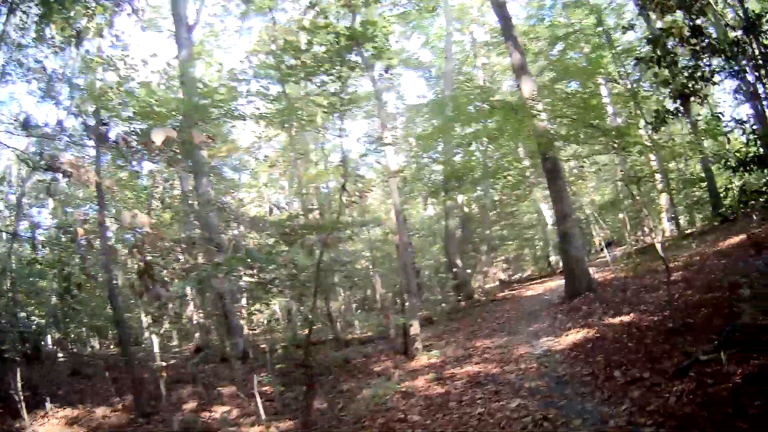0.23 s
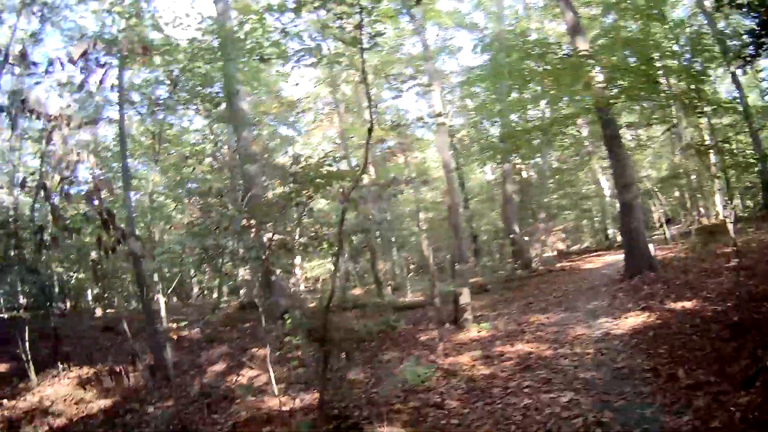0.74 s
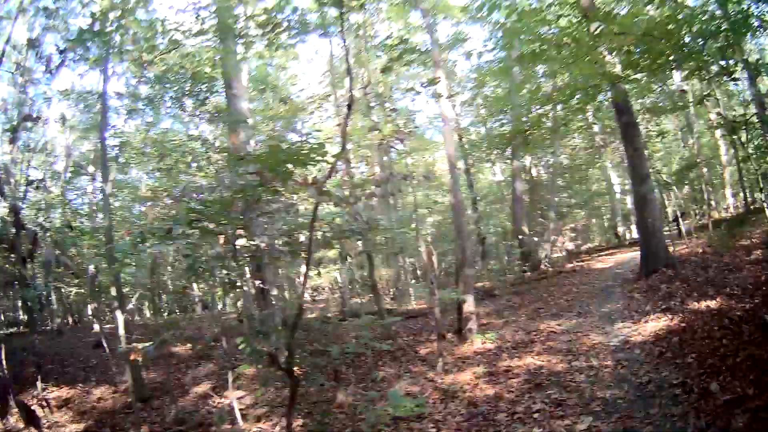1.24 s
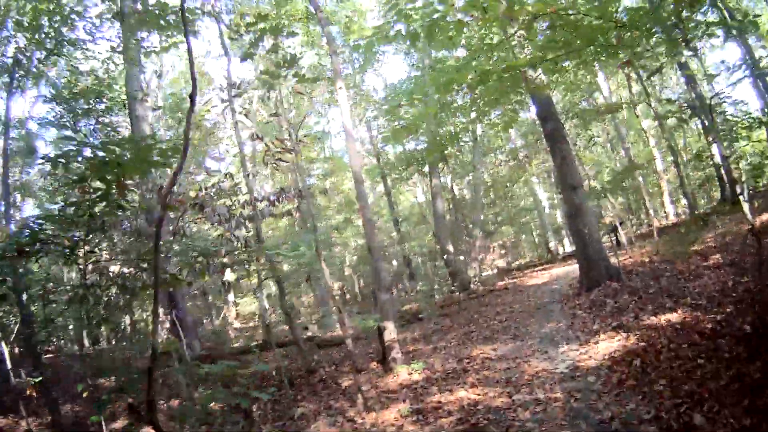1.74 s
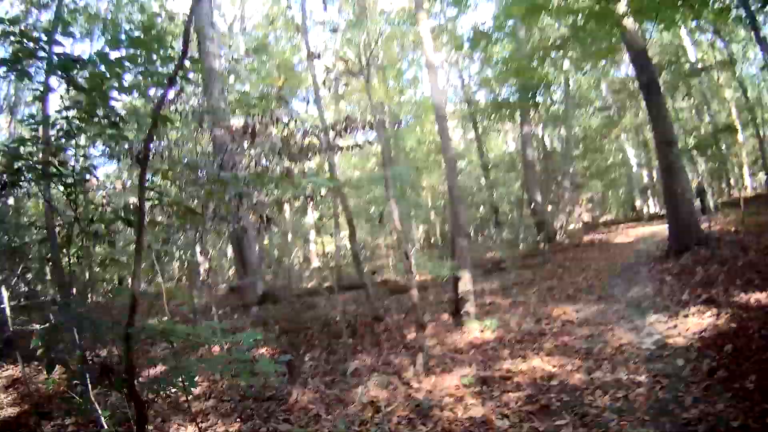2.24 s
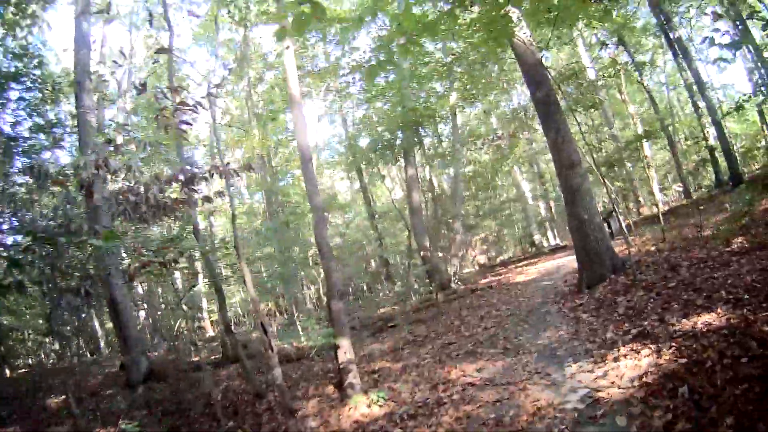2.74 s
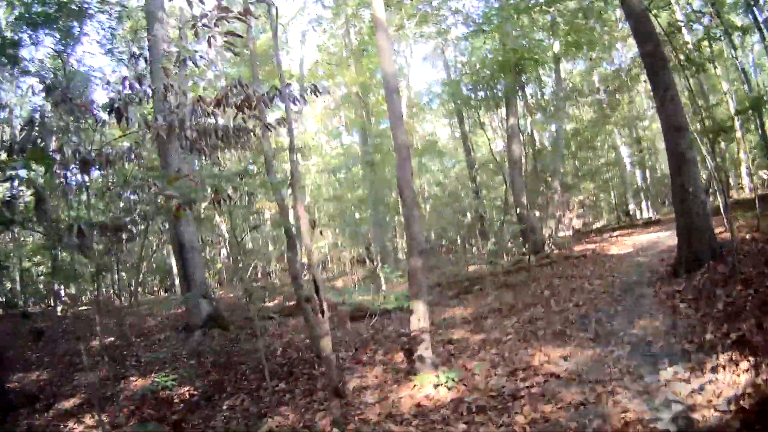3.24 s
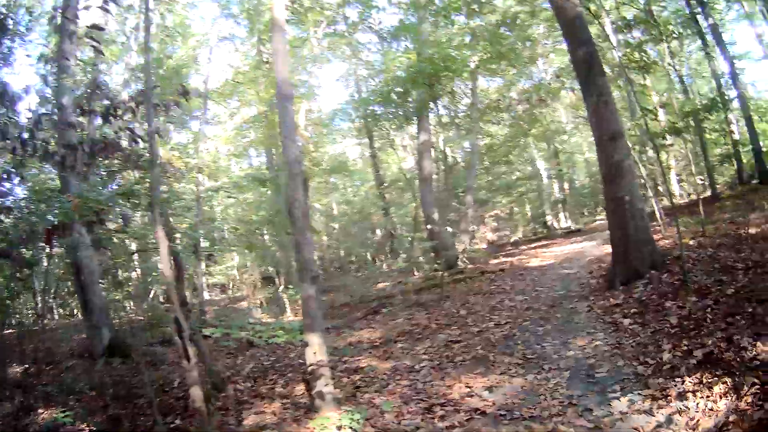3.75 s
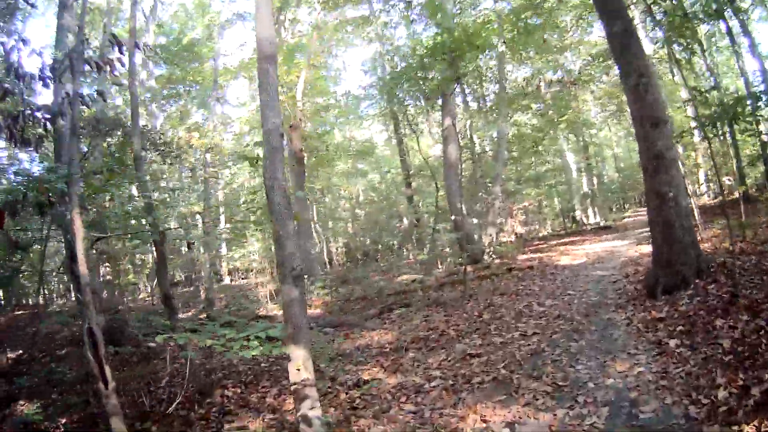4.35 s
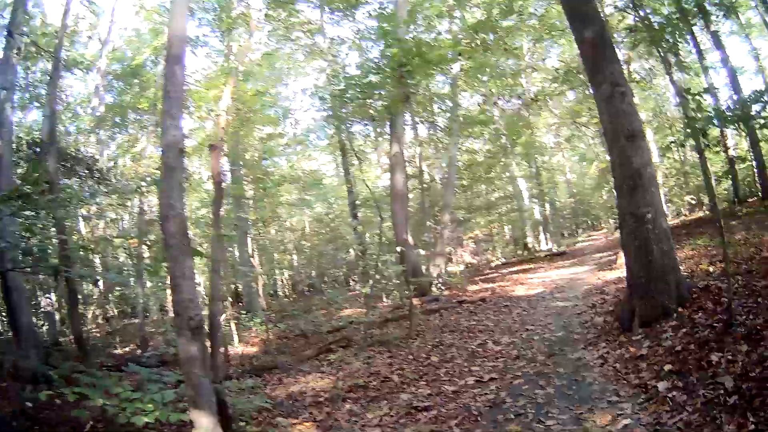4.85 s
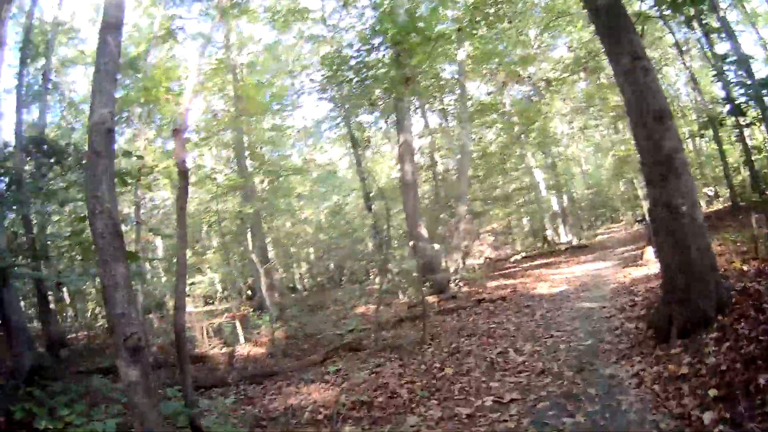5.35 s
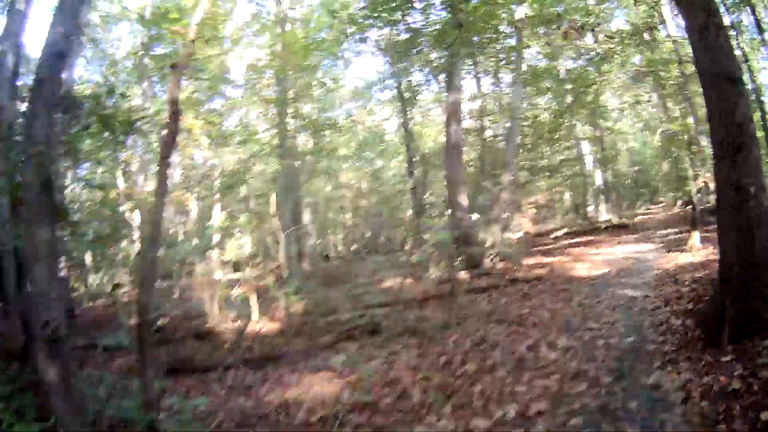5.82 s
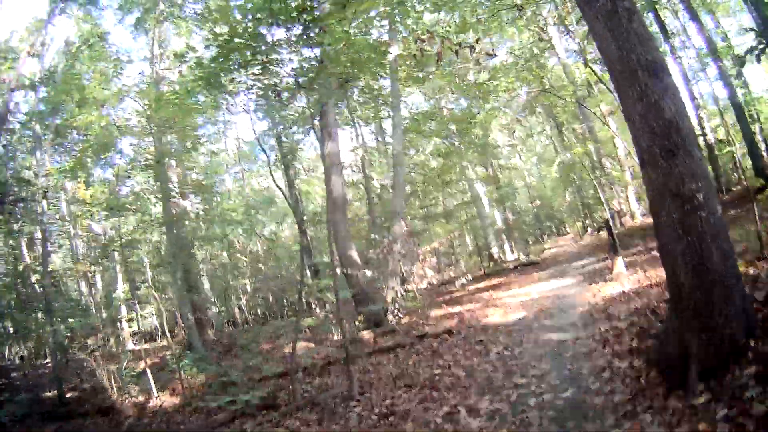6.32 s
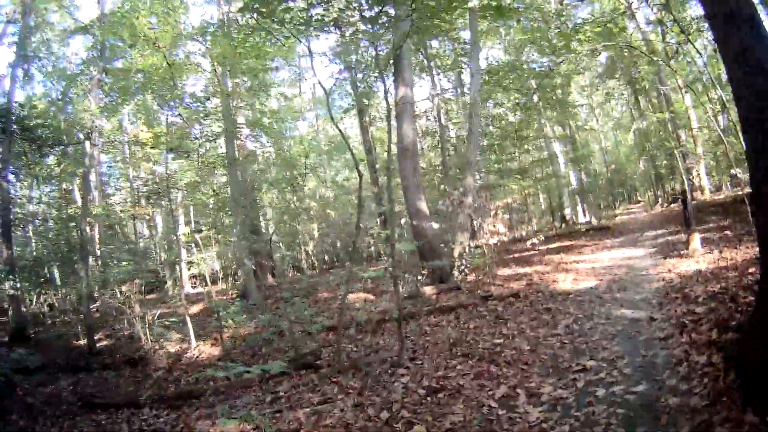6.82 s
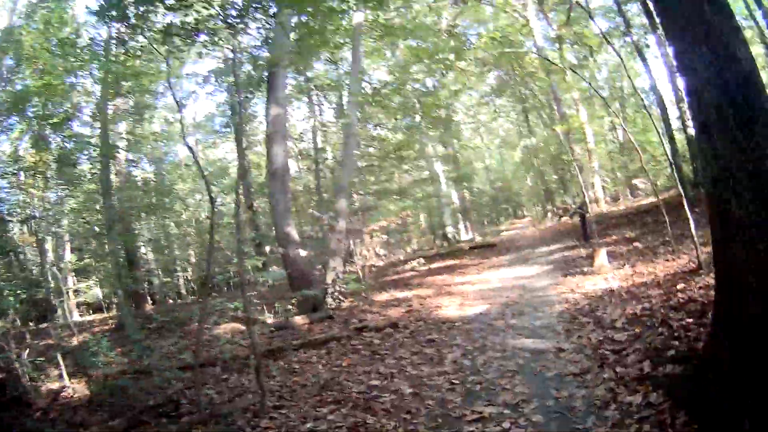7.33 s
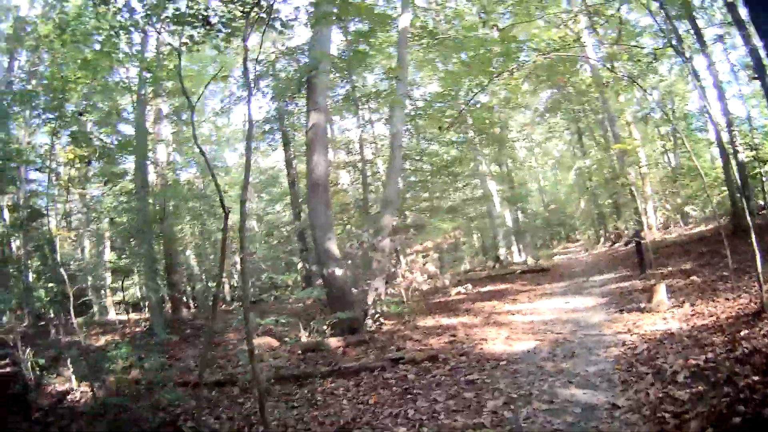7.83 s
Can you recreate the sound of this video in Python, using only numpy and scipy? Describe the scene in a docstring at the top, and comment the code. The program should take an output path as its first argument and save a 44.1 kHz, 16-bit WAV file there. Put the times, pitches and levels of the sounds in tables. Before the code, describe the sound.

Outdoors in quiet woods, regular footsteps crunch through dry leaves close to a carried microphone. Grainy soil scuffs come with brittle cracks and short woody knocks, becoming somewhat heavier later. Between steps, loose litter rustles softly. Wind thumps low in brief gusts, a faint distant hum persists, crickets trill thinly, and a bird gives a few very quiet chips near two seconds.

```python
"""Someone carrying a microphone walks a leaf-strewn dirt trail in the woods.
From the start wind rumbles, a distant hum drones and two crickets trill over a far chorus (shaped noise, sines).
Each step scuffs soil and crushes dry leaves (clouds of short wavelets), and the microphone heaves with the gait.
Brittle leaves snap from 0.1 s (resonated bursts) and grit knocks from 0.55 s (damped rings).
A bird chips at 1.6 s and again from 2.2 s (gliding sines)."""
import sys
import numpy as np
from scipy import signal
from scipy.fft import rfft, irfft
from scipy.io import wavfile
from scipy.ndimage import uniform_filter1d

SR = 44100
rng = np.random.default_rng(int(sys.argv[2]) if len(sys.argv) > 2 else 0)


def waveform_to_disk(signal):
    """Save audio, clipped to [-1, 1], as 16-bit WAV at the path in sys.argv[1]."""
    frames = np.transpose(np.atleast_2d(signal))
    scaled = np.clip(frames, -1, 1) * 32767
    samples = np.round(scaled).astype(np.int16)
    wavfile.write(sys.argv[1], SR, samples)


N = 356283
TIME = np.arange(N) / SR


def gain_of(db):
    """Level: 20 dB is a factor of ten in amplitude."""
    return 10 ** (np.asarray(db) / 20)


def evened(x):
    """Normalisation: x scaled to rms 1."""
    return x / np.sqrt(np.mean(x ** 2) + 1e-20)


def pooled(gains):
    """Incoherent addition: unrelated sounds add in power."""
    return np.sqrt(sum(g ** 2 for g in gains))


def columns(rows):
    """Linear interpolation: every column of a (time, ...) table, sample by sample."""
    s, *rest = np.transpose(rows)
    return [np.interp(TIME, s, c) for c in rest]


def add(mix, s, sound):
    """Superposition: adds the sound to the mix from time s."""
    part = mix[round(s * SR):][:len(sound)]
    part += sound[:len(part)]


def coloured(x, points):
    """Spectral shaping: filters x by (frequency [Hz], gain [dB]) points, then scales it to rms 1."""
    hz, db = np.transpose(points)
    f = np.fft.rfftfreq(len(x), 1 / SR)
    gain = gain_of(np.interp(np.log(f + 1), np.log(hz + 1), db))
    return evened(irfft(rfft(x) * gain, len(x)))


def resonate(x, hz, width):
    """Resonance: a single damped mode of gain 1, whose bandwidth sets its decay."""
    r = np.exp(-np.pi * width / SR)
    return 2 * signal.lfilter([1 - r], [1, -r * np.exp(2j * np.pi * hz / SR)], x).real


def wobble(seconds):
    """Random modulation: noise averaged twice over the given time, rms 1."""
    size = int(seconds * SR)
    once = uniform_filter1d(rng.standard_normal(N), size)
    return evened(uniform_filter1d(once, size))


def swell(start, rise, end, sag_db_per_s, release):
    """Envelope: gain rises from start, sags exponentially, and decays faster after end."""
    t = TIME - start
    sag_db = sag_db_per_s * np.maximum(t - rise, 0)
    release_db = 20 * np.maximum(t - end, 0) / max(release, .002)
    return np.clip(t / max(rise, .002), 0, 1) ** 2 * gain_of(-sag_db - release_db)


def grains(low_hz, high_hz, per_s, cycles, spread_db, clumps_db, count):
    """Granular friction: wavelets at random moments, mostly small, a few large, swelling in clumps."""
    sizes = gain_of(spread_db * np.minimum(rng.exponential(1, N), 4))
    sizes *= rng.random(N) < per_s / SR
    sizes *= rng.choice([-1., 1.], N) * gain_of(clumps_db)
    kind, out = rng.integers(0, count, N), np.zeros(N)
    for k, hz in enumerate(np.geomspace(low_hz, high_hz, count)):
        turns = np.arange(int(6 * cycles * SR / hz)) * hz / SR
        wavelet = np.sin(2 * np.pi * turns) * turns * np.exp(-2 * turns / cycles)
        out += signal.oaconvolve(sizes * (kind == k), wavelet / np.linalg.norm(wavelet))[:N]
    return evened(out)


# wind spectrum: (frequency [Hz], level per Hz [dB])
WIND_COLOUR = [(4.7, -28), (8, -18.5), (18, 0.5), (50, -13.5), (100, -21), (130, -41), (200, -42.5),
               (340, -57.5), (570, -120)]
# gusts: (peak time [s], level [dB], half-width to 1/e [s])
GUSTS = [(.13, -39, 0.085), (.79, -29.5, 0.076), (1.8, -52, 0.064), (2.32, -48, 0.085), (3.45, -46.5, 0.13),
         (4.33, -34.5, 0.043), (4.5, -43, 0.32), (4.7, -40.5, 0.11), (6.67, -34, 0.11), (7.05, -38.5, 0.06),
         (7.86, -32, 0.05)]
WIND_DB = -44  # steady wind
STRIDE_WIND_DB, STRIDE_WIND_S = -48.5, 0.14  # a puff as each step takes the weight


def wind():
    """Turbulent pressure: low noise on the microphone, with lumps, gusts and a puff at each step."""
    puffs = GUSTS + [(s + weight, STRIDE_WIND_DB, STRIDE_WIND_S) for s, weight, *_ in STEPS]
    puff_gains = [gain_of(db) * np.exp(-((TIME - s) / width) ** 2) for s, db, width in puffs]
    level = pooled([gain_of(WIND_DB)] + puff_gains)
    lumps_db = 1.5 * wobble(.03)
    return level * gain_of(lumps_db) * coloured(rng.standard_normal(N), WIND_COLOUR)


# hush of the woods: (frequency [Hz], relative level [dB])
AIR_COLOUR = [(70, -23.5), (120, 0.5), (212, -8.5), (817, -17), (1850, -23), (3320, -27.5), (7130, -29.5),
              (8370, -37.5), (10900, -65)]
AIR_DB = -58


def air():
    """Ambient noise: a broadband hush whose level flickers."""
    return gain_of(AIR_DB + 0.99 * wobble(0.029)) * coloured(rng.standard_normal(N), AIR_COLOUR)


# distant hum: (time [s], frequency [Hz], level [dB])
HUM = [(0, 160.7, -64.5), (3, 161.2, -62), (6.2, 157.8, -62), (6.5, 156.3, -67.5), (8.1, 159.6, -65.5)]


def hum():
    """Frequency modulation: a distant sine wavers in pitch and level."""
    hz, level_db = columns(HUM)
    phase = 2 * np.pi * np.cumsum(hz + 1.5 * wobble(0.09)) / SR
    return np.sqrt(2) * gain_of(level_db + 1.1 * wobble(0.26)) * np.sin(phase)


# each cricket: pulse rate [1/s], mid-pulse pitch [Hz], then rows
# (time [s], lateness as the distance changes [ms])
NEAR_CRICKET = 50, 4170, [(0, 7), (.5, 11), (1, 12), (2, 15.6), (2.5, 19.6), (3.1, 20.8), (3.6, 19.8),
                (4.8, 19.6), (5.3, 20.4), (6.1, 25), (6.4, 26), (7, 25), (8.1, 22.6)]
FAR_CRICKET = 58.2, 4330, [(0, -7), (1.9, -7), (2.6, -3), (4, -4), (5, 1.8), (6.1, 7), (6.5, 7), (7.4, 3),
               (8.1, 2.5)]
# cricket levels: (time [s], near level [dB], far level [dB])
CRICKET_LEVELS = [(0, -71.5, -77), (.5, -72.5, -69), (1.5, -67.5, -72.5), (2.5, -70, -75.5),
                  (3.6, -64.5, -70), (4.2, -69.5, -72.5), (4.8, -60.5, -73.5), (5.4, -67.5, -74),
                  (6.1, -67.5, -76), (6.4, -80, -80), (7, -70, -79), (7.4, -69.5, -70.5), (8.1, -71.5, -68)]


def cricket(per_s, centre_hz, rows, level_db, length=.0135, fall_hz=850):
    """Stridulation: each wing stroke is a short tone that slides down as the stroke slows."""
    late_ms = columns(rows)[0]
    strokes = per_s * (TIME - late_ms / 1000) + .5
    u = (strokes % 1 - .5) / per_s  # time from mid-pulse
    uneven, detune, start = rng.standard_normal((600, 3))[strokes.astype(int) % 600].T
    slide = fall_hz * (u ** 2 / (2 * length) + u ** 3 / (3 * length ** 2))
    turns = (centre_hz + 40 * detune) * u - slide + start
    pulse = np.cos(np.pi * np.clip(u / length, -.5, .5)) ** 2
    return gain_of(level_db + 2.0 * uneven) * evened(np.sin(2 * np.pi * turns) * pulse)


CHORUS_HZ, CHORUS_DB = 4343, -70.5


def chorus():
    """Incoherent sum: many crickets farther off blur into a fuzzy band of noise."""
    band = resonate(resonate(rng.standard_normal(N), CHORUS_HZ, 650), CHORUS_HZ, 650)
    flutter_db = 1.5 * wobble(.006) + .8 * wobble(.3)
    return gain_of(CHORUS_DB + flutter_db) * evened(band)


# footfalls: (sole touches the leaves at [s], full weight after [s], rolls from heel to ball after [s],
# lull in that roll [dB], lifts after [s], scuff [dB], leaf crush [dB], thin crackle [dB])
STEPS = [(-.1, .04, 0.083, 0, 0.25, -55.5, -73, -77), (0.399, 0.011, 0.084, -4, 0.23, -50.5, -53.5, -58.5),
         (1.028, 0.019, 0.056, -11, 0.16, -50.5, -56.5, -61),
         (1.698, 0.023, 0.086, -8, .15, -52.5, -58.5, -64), (2.221, 0.069, 0.051, 0, 0.15, -50, -57, -62.5),
         (2.772, 0.053, 0.16, -5, 0.17, -45.5, -53.5, -60),
         (3.388, .05, .075, -0.5, 0.094, -47.5, -57.5, -66.5),
         (4.001, 0.022, 0.14, -1, .15, -48, -59, -63.5), (4.549, 0.072, 0.17, -8, 0.21, -48, -59, -65),
         (5.149, 0.073, .14, -14, 0.17, -46.5, -53.5, -59),
         (5.721, 0.11, .16, -2.5, 0.21, -50.5, -61.5, -70),
         (6.38, 0.036, 0.095, -2.5, .13, -51, -57.5, -70), (6.929, 0.035, 0.12, -14, 0.16, -46, -54, -60.5),
         (7.59, 0.016, 0.079, -6.5, 0.13, -46.5, -55, -67)]
# rustle between the steps: (time [s], level [dB], level of its dull part [dB])
RUSTLE = [(0, -68, -64), (.3, -74, -74), (.7, -64, -66), (1, -72.5, -70), (1.6, -72.5, -65.5),
          (2.05, -59, -59.5), (2.7, -59.5, -63), (3.1, -64, -70), (3.6, -56, -74), (3.9, -69.5, -75),
          (4.2, -60.5, -64), (4.8, -62, -71.5), (5.1, -70, -67.5), (5.5, -64.5, -72), (6, -61.5, -75),
          (6.3, -65.5, -67.5), (7.4, -64, -66.5), (8.1, -65, -71)]
RUSTLE_CRUSH_DB, RUSTLE_CRACKLE_DB = -9, -12.5  # under the rustle level
ROLL_S = 0.014  # half-width of the lull to 1/e
STEP_MURMUR_DB = -10  # dull part of the scuff
SCUFF_SAG_DB_PER_S, SCUFF_RELEASE_S = 40.5, 0.066  # the soil is loudest under full weight
# leaves give way from the first touch: rise [s], sag [dB/s], release [s]
CRUSH_RISE_S, CRUSH_SAG_DB_PER_S, CRUSH_RELEASE_S = 0.019, 28, 0.028
CRACKLE_RISE_S, CRACKLE_SAG_DB_PER_S, CRACKLE_RELEASE_S = 0.019, 46.5, .04
SCATTER_DB, SCATTER_S = -27, .03  # soil stirred by each knock, relative to the knock
DEBRIS_DB, DEBRIS_S = -10, 0.0087  # crumbs of leaf after each snap, relative to the snap


def tread():
    """Granular friction: the sole grinds soil in low grains; leaves crush and crackle in finer ones."""
    rustle, dull = gain_of(columns(RUSTLE))
    soil = [rustle]
    leaves = [rustle * gain_of(RUSTLE_CRUSH_DB)]
    fine = [rustle * gain_of(RUSTLE_CRACKLE_DB)]
    for s, weight, roll, lull_db, lift, scuff_db, crush_db, crackle_db in STEPS:
        lull = gain_of(lull_db * np.exp(-((TIME - s - roll) / ROLL_S) ** 2))
        grind = swell(s, weight, lift, SCUFF_SAG_DB_PER_S, SCUFF_RELEASE_S)
        give = swell(s, CRUSH_RISE_S, lift, CRUSH_SAG_DB_PER_S, CRUSH_RELEASE_S)
        splinter = swell(s, CRACKLE_RISE_S, lift, CRACKLE_SAG_DB_PER_S, CRACKLE_RELEASE_S)
        soil.append(lull * gain_of(scuff_db) * grind)
        leaves.append(lull * gain_of(crush_db) * give)
        fine.append(lull * gain_of(crackle_db) * splinter)
    soil += [gain_of(db + SCATTER_DB) * swell(s, 0, 0, 0, SCATTER_S) for s, db, *_ in KNOCKS]
    leaves += [gain_of(db + DEBRIS_DB) * swell(s, 0, 0, 0, DEBRIS_S) for s, db, *_ in SNAPS]
    # the litter gives way in jerks, heard in every grain size at once
    slips = wobble(.004) + .8 * wobble(.012)
    scuff = grains(510, 1125, per_s=1300, cycles=0.94, spread_db=3.0, clumps_db=2.0 * slips, count=9)
    crush = grains(1340, 3890, per_s=3300, cycles=1.34, spread_db=3.0, clumps_db=2.2 * slips, count=9)
    crackle = grains(4200, 7450, per_s=39000, cycles=3.7, spread_db=5.0, clumps_db=0.65 * slips, count=9)
    murmur = grains(248, 448, per_s=650, cycles=1.5, spread_db=1.5, clumps_db=1.7 * slips, count=5)
    soil_level = pooled(soil)
    murmur_level = pooled([dull, soil_level * gain_of(STEP_MURMUR_DB)])
    low = murmur_level * murmur + soil_level * scuff
    return low + pooled(leaves) * crush + pooled(fine) * crackle


def settling():
    """Elastic recovery: trodden leaves tick at random as they spring back."""
    return gain_of(-74) * grains(900, 3500, per_s=30, cycles=.8, spread_db=2.5, clumps_db=0, count=5)


# start of each step's heave cycle: time [s]
GAIT = [-.45, .144, .75, 1.299, 1.888, 2.447, 3.046, 3.617, 4.186, 4.775, 5.382, 5.981, 6.581, 7.17, 7.778,
        8.38]
# harmonics of the heave: (multiple of the step rate, level [dB], lag [cycles])
HEAVE = [(1, -35, .27), (2, -33, -.03), (3, -41, -.04), (4, -43.5, -.04), (5, -48, .02)]


def heave():
    """Harmonic series: the microphone rises and drops with each step, swinging pressure below hearing."""
    steps = np.interp(TIME, GAIT, np.arange(len(GAIT)))
    swing = sum(np.sqrt(2) * gain_of(db) * np.cos(2 * np.pi * (k * steps - lag)) for k, db, lag in HEAVE)
    return swing * gain_of(2.2 * wobble(0.48))


# bright snaps: (time [s], peak level [dB], length [s], centre of the colour [Hz])
SNAPS = [(0.103, -48.5, 0.0013, 2400), (0.197, -36.5, 0.0053, 3300), (0.6717, -37, 0.0036, 4350),
         (0.894, -55, 0.0028, 6500), (1.11, -46, 0.0043, 4070), (1.252, -38, 0.0033, 2200),
         (1.2656, -35.5, 0.0014, 4600), (1.279, -42.5, 0.0023, 2800), (1.319, -48, .002, 2400),
         (1.362, -42, 0.0083, 3630), (1.844, -40.5, 0.0042, 5150), (2.058, -49, 0.004, 6000),
         (2.506, -39.5, 0.0062, 3300), (2.95, -39.5, 0.01, 5400), (3.677, -40, 0.0034, 3760),
         (3.771, -41.5, 0.0035, 5000), (3.789, -44, 0.0096, 3200), (4.128, -40.5, 0.012, 5000),
         (4.13, -54, 0.0036, 5440), (4.843, -48, 0.0042, 3300), (5.32, -43.5, 0.0028, 3480),
         (5.321, -57, 0.0035, 3500), (5.4074, -41.5, 0.0032, 4330), (6.035, -42.5, 0.0064, 3600),
         (6.4976, -38.5, 0.0059, 5370), (7.1274, -38.5, 0.0024, 4070), (7.225, -45, 0.0047, 3300),
         (7.733, -38, 0.006, 4810)]
# modes of the brittle body: (frequency [Hz], nominal width [Hz], level [dB])
SNAP_RING = [(1300, 660, 2), (2200, 770, 3), (3300, 820, 2), (4420, 1100, -1.5), (5330, 1960, 0),
             (6620, 580, -14)]


def snaps():
    """Modal excitation: milliseconds of tiny cracks ring the same brittle body each time."""
    out, t = np.zeros(N), np.arange(1300) / SR
    no_bass = signal.butter(N=2, Wn=900, btype="high", fs=SR, output="sos")  # small things radiate no bass
    all_cracks = rng.standard_normal((len(SNAPS), len(t)))
    for (s, db, length, centre_hz), cracks in zip(SNAPS, all_cracks):
        burst = cracks * np.sqrt(abs(cracks)) * np.exp(-(t / max(length, .0005)) ** 2)
        snap = np.zeros(len(t))
        for hz, width, mode_db in SNAP_RING:
            mode = resonate(resonate(burst, hz, 0.96 * width), hz, 0.96 * width)
            # modes far from the centre of the colour are weaker
            snap += gain_of(mode_db - 4.6 * np.log2(hz / centre_hz) ** 2) * mode / np.sqrt(width)
        snap = signal.sosfilt(no_bass, snap)
        add(out, s, gain_of(db) * snap / abs(snap).max())
    return out


# dull knocks of grit and twigs under the sole:
# (time [s], ring level [dB], pitch [Hz], sharp edge relative to the ring [dB])
KNOCKS = [(0.55, -30, 714, -15), (0.72, -32.5, 550, -20), (1.312, -39, 820, -7), (1.726, -34.5, 700, -13),
          (1.883, -31.5, 543, -26), (2.321, -32, 850, -3.5), (2.393, -34.5, 960, -24),
          (2.463, -44.5, 468, -7), (2.867, -26, 690, -12), (3.033, -31.5, 574, -20),
          (3.4933, -21.5, 940, -12), (4.0435, -25.5, 654, -6.5), (4.143, -33.5, 530, -9),
          (4.206, -35.5, 550, -20), (4.307, -34.5, 607, -10.5), (4.802, -35.5, 916, -6.5),
          (5.049, -47, 870, 1.5), (5.259, -36, 526, -21), (5.393, -32.5, 605, -15), (5.815, -32, 623, -17),
          (6.58, -32, 486, -32), (6.968, -29, 584, -9), (7.04, -22.5, 890, -12.5), (7.063, -27.5, 800, -28),
          (7.183, -27, 780, -18.5), (7.208, -43, 895, -3), (7.675, -33.5, 915, -11), (7.782, -31, 550, -25)]


def knocks():
    """Impact: a brief damped ring, led by a short sharp edge where something breaks."""
    out, t = np.zeros(N), np.arange(1000) / SR
    for s, db, hz, edge_db in KNOCKS:
        turns = hz * t
        ring = (turns / 0.76 * np.exp(1 - turns / 0.64)) ** 1.75 * np.sin(2 * np.pi * turns)
        edge_envelope = t / 0.00017 * np.exp(1 - t / 0.00022)
        edge = gain_of(edge_db) * np.sin(2 * np.pi * 1900 * t) * edge_envelope
        add(out, s, gain_of(db) * (ring + edge))
    return out


# bird notes: (time [s], length [s], start pitch [Hz], end pitch [Hz], glide time [s], peak level [dB])
CHIPS = [(1.602, 0.018, 5400, 7700, 0.0063, -56.5), (2.243, 0.011, 5900, 6270, 0.003, -54),
         (2.265, 0.0064, 6150, 6100, 0.0031, -56), (2.285, .012, 6250, 6130, .004, -56)]


def bird():
    """Frequency glide: thin whistles relax exponentially to their end pitch."""
    out = np.zeros(N)
    for s, length, start_hz, end_hz, glide, db in CHIPS:
        t = np.arange(int(length * SR)) / SR
        hz = end_hz + (start_hz - end_hz) * np.exp(-t / glide)
        whistle = np.sin(2 * np.pi * np.cumsum(hz) / SR)
        add(out, s, gain_of(db) * signal.windows.tukey(len(t), .6) * whistle)
    return out


def scene():
    """Superposition: the walker, the woods and the wind add linearly."""
    near_db, far_db = columns(CRICKET_LEVELS)
    crickets = cricket(*NEAR_CRICKET, near_db) + cricket(*FAR_CRICKET, far_db) + chorus()
    woods = air() + hum() + crickets + bird()
    walker = tread() + settling() + heave() + snaps() + knocks()
    return (wind() + woods + walker)[None]


OFFSET = -.0073  # constant shift, full scale 1
EDGE_HZ = 8500  # band limit


def record(dry):
    """Low-pass response: the microphone dulls towards the top, with a small offset; then the band limit."""
    dulled = signal.sosfilt(signal.butter(N=4, Wn=7300, fs=SR, output="sos"), dry) + OFFSET
    held = np.pad(dulled, ((0, 0), (255, 255)), "edge")  # keeps the offset steady at both ends
    band_limit = signal.firwin(511, EDGE_HZ, window=("kaiser", 9), fs=SR)
    return signal.oaconvolve(held, band_limit[None], "valid")


dry = scene()
out = record(dry)
waveform_to_disk(out)
```